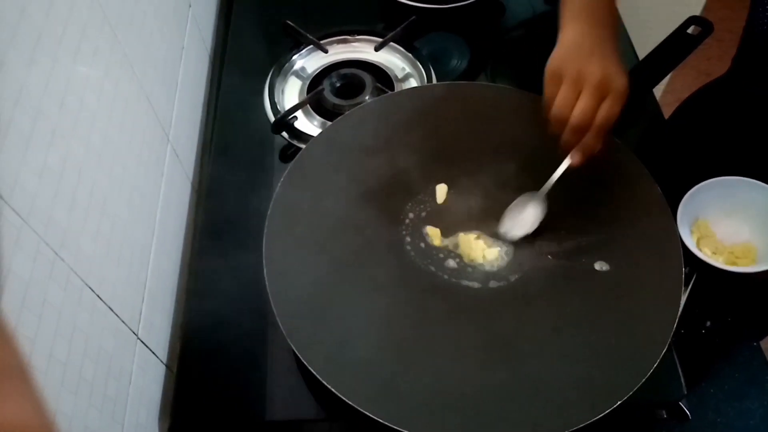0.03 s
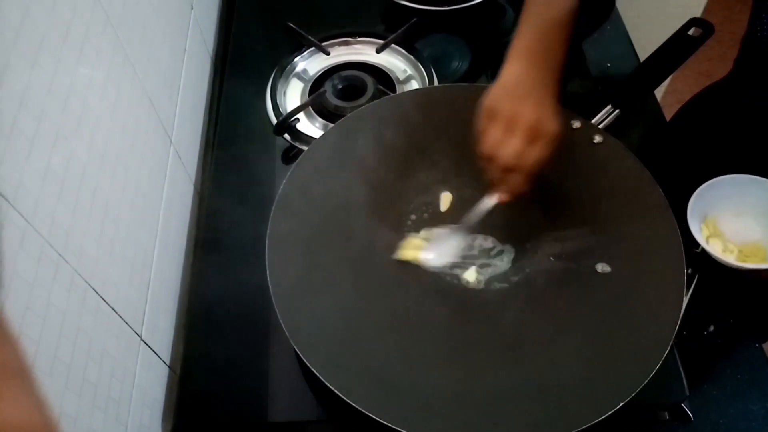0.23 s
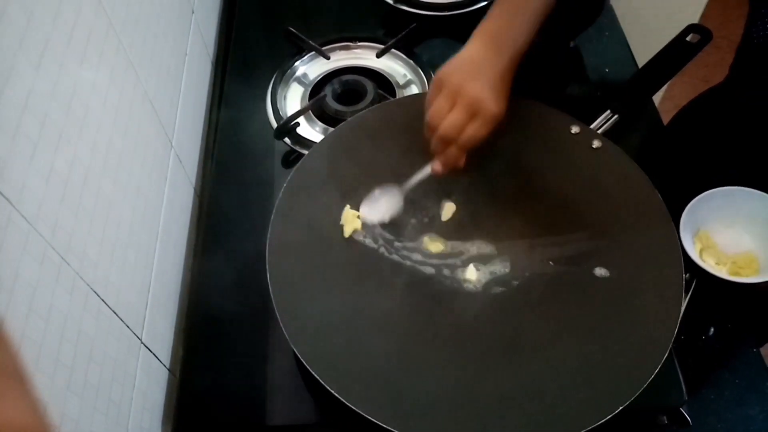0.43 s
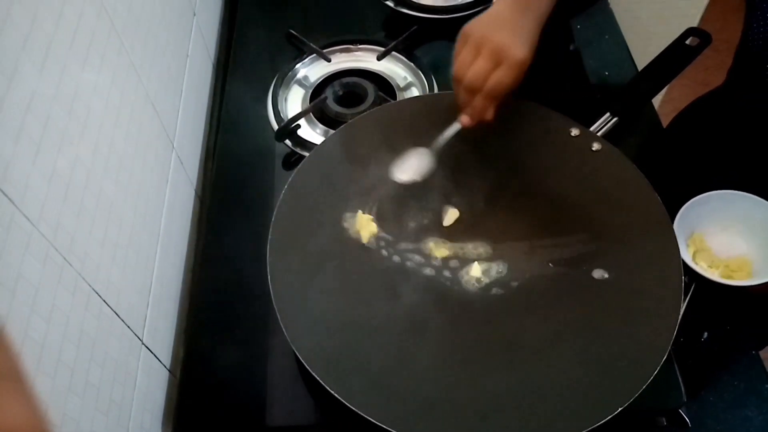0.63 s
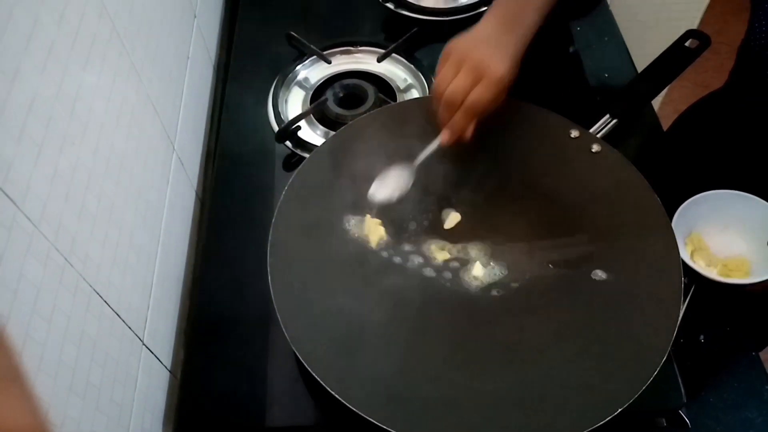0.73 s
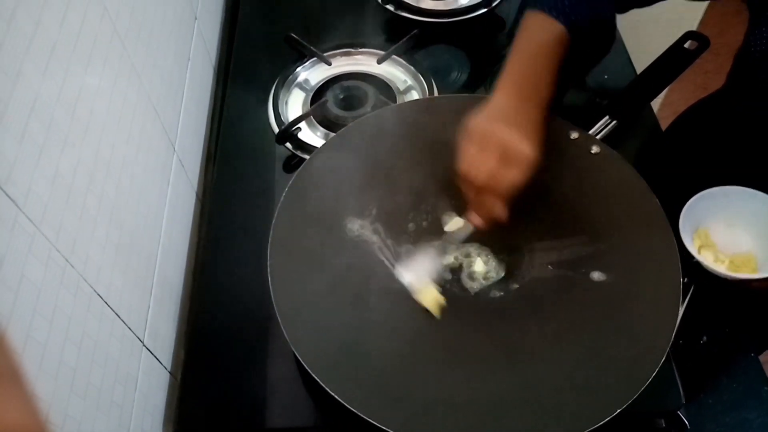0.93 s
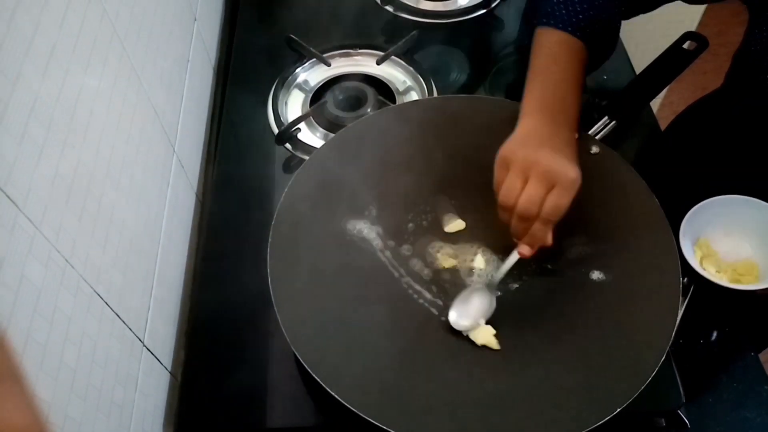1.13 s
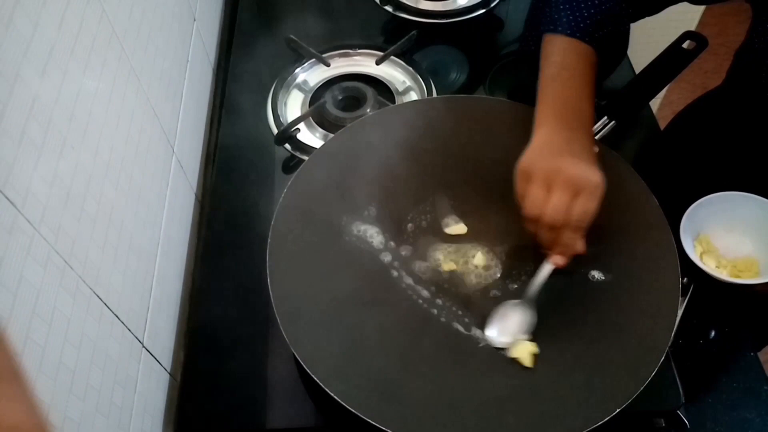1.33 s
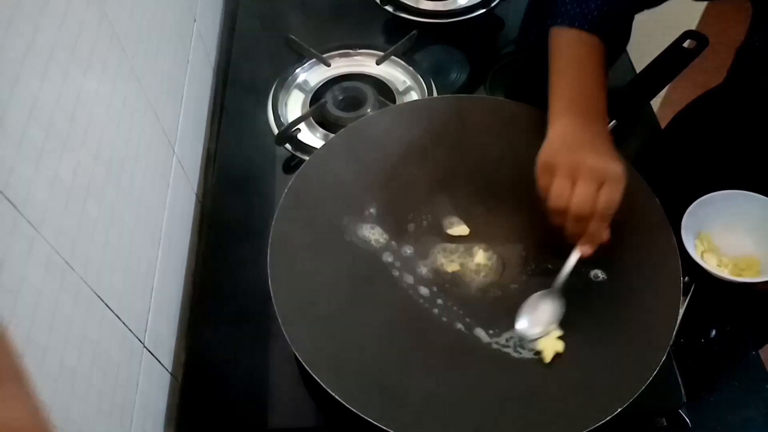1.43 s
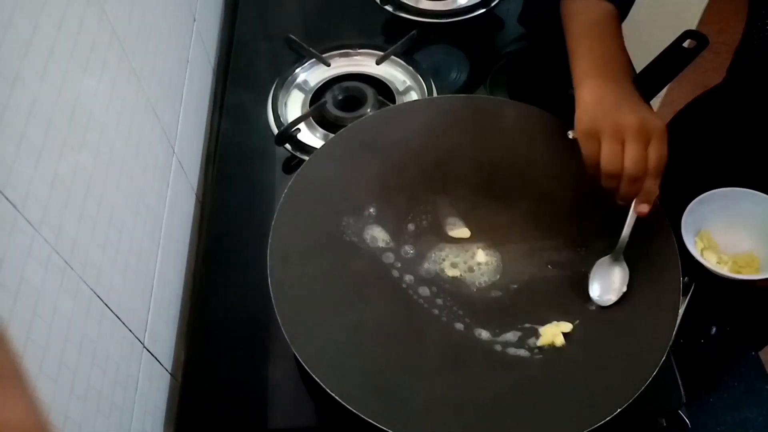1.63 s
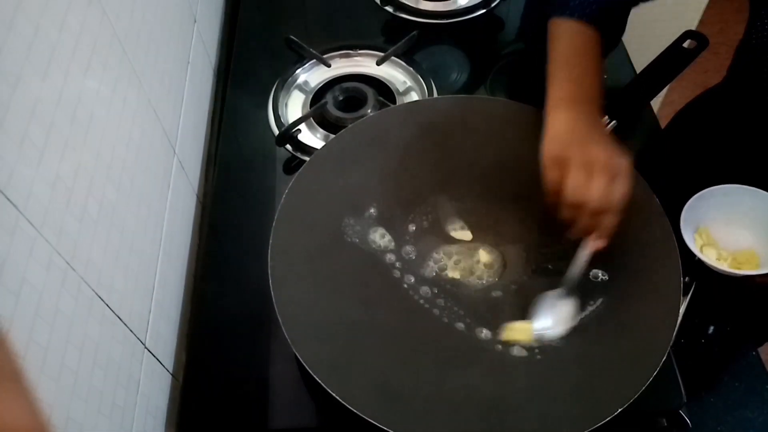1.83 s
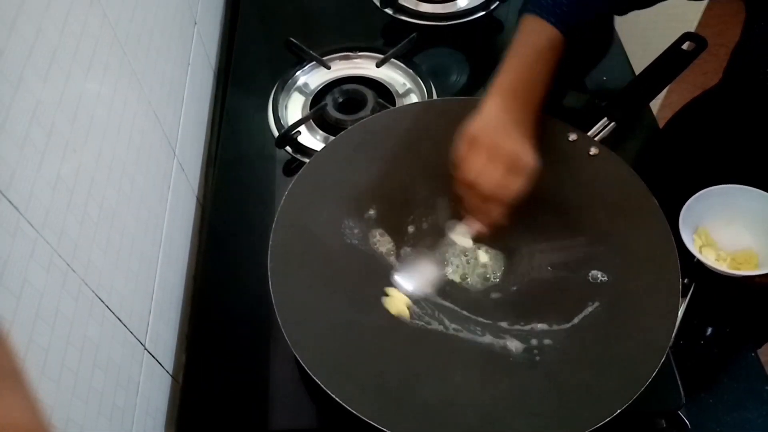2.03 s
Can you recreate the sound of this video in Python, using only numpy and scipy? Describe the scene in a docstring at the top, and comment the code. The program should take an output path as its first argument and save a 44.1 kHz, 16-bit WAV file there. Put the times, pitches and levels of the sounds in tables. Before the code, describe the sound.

Butter sizzles on a hot flat pan for about two seconds, a constant, bright, fine-grained hiss with fluttering crackles. Small spits cluster near 0.3, the sharpest pop snaps at 0.65, and another comes around 2.0. A metal spoon rasps softly at the start, taps near 1.0 and 1.15, knocks and rings the pan clearest at 1.37, then scrapes again from 1.9. Faint low burner rumble; close stereo, short kitchen reverberation.

```python
"""Butter sizzling on a griddle

Thousands of tiny steam bubbles burst as damped pings; a few larger ones spit with a crack and a ping.
A steel spoon rasps, knocks and rings the modes of the pan, over the low rumble of a gas burner.
A small tiled kitchen answers; the two microphones differ in colour, and the left one is nearer."""
import sys
import numpy as np
from scipy import signal
from scipy.fft import rfft, irfft, next_fast_len
from scipy.io import wavfile
from scipy.ndimage import uniform_filter1d

SR = 44100
rng = np.random.default_rng(int(sys.argv[2]) if len(sys.argv) > 2 else 0)


def generate_wav(sig):
    """Save sig (samples, or channels by samples) to the path in sys.argv[1] as 16-bit PCM at SR."""
    pcm = np.round(np.clip(np.atleast_2d(sig).T, -1, 1) * 32767).astype(np.int16)
    wavfile.write(sys.argv[1], SR, pcm)


N = 91375

# Sizzle strength. Each row: time in seconds, level in dB.
SIZZLE_LEVEL = [(0, -33.3), (.15, -35.3), (.33, -33.2), (.62, -33.2), (1.05, -32.8), (1.4, -33.3),
                (1.7, -35), (2.07, -33.9)]
# Colour of the bursting bubbles. Each row: frequency in Hz, gain in dB.
SIZZLE_COLOUR = [(30, -34), (250, -25), (600, -26), (1000, -20), (1500, -16), (2200, -11.5), (2800, -4),
                 (4000, -2.5), (6500, 0), (8300, -4.5), (9700, -1), (11000, -6), (13500, -14), (15000, -6)]
# Large bubbles that spit. Each row: start in seconds, ping level in dB, pitch in Hz, crack level in dB.
LARGE_SPITS = [(0.186, -17, 6370, -42), (.2810, -22, 6300, -34), (.2865, -10, 6070, -28),
               (.2935, -17, 6400, -34), (.3500, -15.5, 7060, -23), (0.502, -12.5, 6280, -21),
               (0.6452, -6.5, 7270, -4), (0.8559, -16, 7100, -18), (0.973, -19, 5600, -17.5),
               (0.979, -17, 6400, -22), (1.027, -18, 6500, -30), (1.045, -17, 6440, -23),
               (1.4381, -18.5, 6600, -33), (2.0364, -10.5, 6200, -28)]
# Colour of the spit cracks. Each row: frequency in Hz, gain in dB.
CRACK_COLOUR = [(40, -24), (200, -20), (600, -15), (1500, -20.5), (3000, -11.5), (5000, 0.5), (7500, 1),
                (10000, 8), (12000, -4), (15000, -6)]
# Spoon strokes. Each row: start in seconds, length in seconds, rasp level in dB, rasp pitch in Hz,
# pan ring level in dB.
SPOON_STROKES = [(0, 0.15, -48.5, 1494, -57), (0.236, .04, -53, 1550, -50), (0.745, 0.02, -44, 1520, -52),
                 (1.035, 0.052, -63, 300, -60), (1.155, 0.008, -41.5, 1620, -45),
                 (1.367, 0.03, -49, 1830, -41), (1.903, 0.15, -48.5, 1500, -53),
                 (2.045, .03, -44, 1450, -42)]
# Spoon landing on the pan. Each row: start in seconds, strength in dB, contact brightness in Hz.
SPOON_KNOCKS = [(0.9712, 0, 4500), (1.158, 4.5, 1600), (1.3685, 13, 3400), (1.383, 5, 4400)]
# Drag of the spoon between strokes. Each row: time in seconds, ring level in dB.
DRAG_LEVEL = [(0, -47), (.5, -75), (1.1, -60), (1.45, -50.5), (2.07, -47)]
# Modes of the pan. Each row: frequency in Hz, width in Hz, level in dB.
PAN_MODES = [(280, 110, -12), (830, 15, -6), (987, 20, -10), (1364, 44, -3.5), (1548, 30, -1),
             (1655, 28, -3.5), (1786, 32, -4), (2150, 36, -1.5), (2603, 24, -1.5), (3155, 44, 6.5),
             (3745, 40, -1), (4450, 50, 2)]
# Pan singing under the spoon. Each row: start in seconds, length in seconds, pitch in Hz, level in dB.
PAN_SONGS = [(1.368, .045, 830, -54.5), (1.44, .23, 829, -64), (1.525, .075, 2165, -50),
             (1.51, .12, 1645, -53), (1.68, .24, 727, -68), (1.9, .07, 1385, -48), (1.93, .1, 825, -66),
             (2.03, .07, 1370, -45)]
# Colour of the flame. Each row: frequency in Hz, gain in dB.
FLAME_COLOUR = [(25, -42), (50, -18), (80, 0), (135, 3), (220, -11), (400, -12.5), (800, -13),
                (2000, -24.5)]
# Low drone. Each row: time in seconds, level in dB.
DRONE_LEVEL = [(0, -70), (.2, -66), (.24, -80), (.53, -66), (.62, -79), (.86, -70), (.96, -76), (1.32, -70),
               (1.48, -80), (1.7, -63), (1.86, -63), (2.04, -58)]
# Microphone colours. Each row: frequency in Hz, gain in dB.
LEFT_COLOUR = [(200, 0), (2000, -1.5), (3000, -2), (9800, 0), (11500, -8.5), (12500, -5), (13800, -13),
               (15000, -7.5)]
RIGHT_COLOUR = [(200, 2), (1500, 5), (4000, 0), (5000, 1.5), (6000, 8), (6500, 11.5), (7000, 6), (8300, -1),
                (10000, 2), (15000, 3.5)]

TOP_HZ = 15700  # band limit, and highest bubble pitch
BUBBLES_PER_S, BUBBLE_DECAY_S = 9000, 0.00012
BUBBLE_MEAN_DB, BUBBLE_CAP_DB = 4.5, 20.5  # exponential spread of strength in dB
PATCHY_DB = 1.02  # rms
FLARES_PER_S, FLARE_DB, FLARE_DECAY_S = 45, 4.5, 0.0037  # rate per patch of foam
SIZZLE_WET_DB = 3
SPIT_PEAK_S, CRACK_DECAY_S, SPIT_WET_DB = 0.000415, 0.0005, -9.5
SMALL_SPITS_PER_S, SMALL_SPIT_MAX_DB, SMALL_SPIT_RANGE_DB = 40, -18, 8
SMALL_CRACK_DB = -6  # relative to the ping setting
SMALL_SPIT_HZ, SMALL_SPIT_OCTAVES = 6600, 1.3
SPIT_DIRECT_DB, SPIT_ECHO_DB, SPIT_ECHO_S = -3.5, -5.5, 0.000762  # paths to the right microphone
STROKE_ATTACK_S, STROKE_RELEASE_S = 0.001, 0.008
RASP_STAGE_WIDTH_HZ = 520  # of each of three cascaded resonances
SLIPS_PER_S, SLIP_SPREAD_DB = 4000, 5
KNOCK_WIDTH_RATIO, KNOCK_CLICK_DB = 1.3, -26  # push width / centre; click beside the modes
DRAG_LOW_HZ = 900
SING_WIDTH_HZ = 9
FLAME_DB, DRONE_HZ, DRONE_WIDTH_HZ = -65, 81, 13
LAG_S, LAG_SCATTER_S = .00102, .00005  # later arrival at the right microphone
ROOM_T60_S, ROOM_GAP_S = 0.21, .002


def sizzle(count=4):
    """Several patches of butter boil at once, each with its own bursts and flares."""
    bubbles = sum(foam(size=count) for _ in range(count))
    return unit(coloured(patchy(bubbles), SIZZLE_COLOUR)) * amp(curve(SIZZLE_LEVEL))


def foam(size):
    """One of size patches of foam: each bubble bursts as a tiny ping of its own pitch and strength."""
    u = rng.random((int(BUBBLES_PER_S * N / SR / size), 4))
    t = np.arange(48) / SR
    strength_db = np.minimum(-BUBBLE_MEAN_DB * np.log(1 - u[:, 0]), BUBBLE_CAP_DB)
    waves = np.cos(2 * np.pi * (TOP_HZ * u[:, 1:2] * t + u[:, 2:3]))
    pings = amp(strength_db)[:, None] * np.exp(-t / BUBBLE_DECAY_S) * waves
    start = u[:, 3] * N
    lag = np.abs(LAG_S + LAG_SCATTER_S * rng.standard_normal(len(u))) * SR

    def placed(first):
        samples = first.astype(int)[:, None] + np.arange(len(t))
        return np.bincount(samples.ravel(), pings.ravel(), N)[:N]
    pair = np.array([placed(start), placed(start + lag)])
    return kitchen(pair * amp(flares()), SIZZLE_WET_DB)


def flares():
    """Clusters of bubbles going off: sudden rises in level, in dB, each with a quick fall."""
    kicks = (rng.random(N) < FLARES_PER_S / SR) * FLARE_DB
    return signal.lfilter([1], [1, -np.exp(-1 / (FLARE_DECAY_S * SR))], kicks)


def patchy(x):
    """Random gain over patches of time and frequency: bands of the sizzle flare on their own."""
    z = signal.stft(x, nperseg=256)[2]
    field = uniform_filter1d(rng.standard_normal(z.shape[1:]), size=10, axis=0)  # over frequency
    field = uniform_filter1d(field, size=9, axis=1)  # over time
    return signal.istft(z * amp(PATCHY_DB * unit(field)), nperseg=256)[1][:, :N]


def spits():
    """A large bubble snaps open with a crack and a very short ping."""
    pings, cracks = np.zeros(N + SR), np.zeros(N + SR)
    t = np.arange(SR // 100) / SR
    ping_envelope = 0.5 * t / SPIT_PEAK_S * np.exp(1 - t / SPIT_PEAK_S)
    crack_envelope = np.exp(-t / CRACK_DECAY_S)
    for start, ping_db, hz, crack_db in list(LARGE_SPITS) + small_spits():
        first = round(start * SR)
        pings[first:][:len(t)] += amp(ping_db) * np.sin(2 * np.pi * hz * t) * ping_envelope
        cracks[first:][:len(t)] += amp(crack_db) * rng.choice([-1, 1], len(t)) * crack_envelope
    return kitchen(spit_paths(pings[:N] + coloured(cracks[:N], CRACK_COLOUR)), SPIT_WET_DB)


def small_spits():
    """Middle-sized bubbles at random moments, as rows like those of the large ones."""
    u = rng.random((int(SMALL_SPITS_PER_S * N / SR), 3))
    db = SMALL_SPIT_MAX_DB - SMALL_SPIT_RANGE_DB * u[:, 1]
    hz = SMALL_SPIT_HZ * 2 ** (SMALL_SPIT_OCTAVES * (u[:, 2] - .5))
    return list(zip(u[:, 0] * N / SR, db, hz, db + SMALL_CRACK_DB))


def spit_paths(x):
    """A spit reaches the right microphone twice: directly and off a nearby surface."""
    left, right = at_mics(x)

    def paths(f):
        return amp(SPIT_DIRECT_DB) + amp(SPIT_ECHO_DB) * delay(f, SPIT_ECHO_S)
    return np.array([left, filtered(right, paths)])


def spoon():
    """Each stroke rasps in a broad resonance: bright on bare steel, dull where butter cushions the spoon."""
    def rasp(hz):
        return unit(filtered(slips(), lambda f: resonance(f, hz, RASP_STAGE_WIDTH_HZ) ** 3))
    out = sum(amp(db) * stroke(start, length) * rasp(hz) for start, length, db, hz, _ in SPOON_STROKES)
    return kitchen(at_mics(out), wet_db=-7)


def slips():
    """Steel catches and slips on the pan in tiny irregular jerks."""
    return (rng.random(N) < SLIPS_PER_S / SR) * amp(SLIP_SPREAD_DB * rng.standard_normal(N))


def stroke(start, length):
    """Pressure of one stroke: attack, hold, release."""
    t = np.arange(N) / SR - start
    return np.clip(t / STROKE_ATTACK_S, 0, 1) * np.exp(-np.maximum(t - length, 0) / STROKE_RELEASE_S)


def knocks():
    """The spoon lands on the pan: one short push rings the modes, with a bare click."""
    def push(f):
        return sum(amp(db) * resonance(f, hz, hz * KNOCK_WIDTH_RATIO) * delay(f, start)
                   for start, db, hz in SPOON_KNOCKS)
    ring = filtered(signal.unit_impulse(N), lambda f: push(f) * (pan_body(f) + amp(KNOCK_CLICK_DB)))
    return kitchen(at_mics(ring), wet_db=-10)


def pan():
    """The dragging spoon keeps the upper modes of the pan ringing; each stroke drives all of them harder."""
    drag = slips()
    light = filtered(drag, lambda f: 1 / (1 + (DRAG_LOW_HZ / (f + 1)) ** 8))  # high-pass
    pressure = sum(amp(db) * stroke(start, length) for start, length, _, _, db in SPOON_STROKES)
    force = light * amp(curve(DRAG_LEVEL)) + drag * pressure
    ring = filtered(force, pan_body) / np.std(filtered(drag, pan_body))
    return kitchen(at_mics(ring), wet_db=-10.5)


def pan_body(f):
    """Response of all the modes of the pan, with alternating signs."""
    return sum((-1) ** k * amp(db) * resonance(f, hz, width)
               for k, (hz, width, db) in enumerate(PAN_MODES))


def singing():
    """As the spoon travels it catches one resonance of the pan after another; each swells and fades."""
    t = np.arange(N) / SR

    def swell(start, length):
        return np.sqrt(np.abs(np.sin(np.pi * np.clip((t - start) / length, 0, 1))))
    return at_mics(sum(amp(db) * swell(start, length) * tone(hz, SING_WIDTH_HZ)
                       for start, length, hz, db in PAN_SONGS))


def burner():
    """The soft rumble of the flame, and a low drone that wavers and swells near the end."""
    noise = coloured(rng.standard_normal(N), FLAME_COLOUR)
    flame = unit(kitchen(at_mics(noise), wet_db=-6))
    drone = tone(DRONE_HZ, DRONE_WIDTH_HZ) * amp(curve(DRONE_LEVEL))
    return amp(FLAME_DB) * flame + at_mics(drone)


def kitchen(pair, wet_db):
    """Add the short ring of the room, decaying noise that differs at each microphone."""
    t = np.arange(SR // 2) / SR
    tail = rng.standard_normal((2, len(t))) * amp(-60 * t / ROOM_T60_S) * (t > ROOM_GAP_S)
    tail /= np.linalg.norm(tail[0])
    return pair + amp(wet_db) * signal.fftconvolve(pair, tail, axes=1)[:, :N]


def at_mics(x):
    """A sound from the pan reaches the left microphone first."""
    return np.array([x, filtered(x, lambda f: delay(f, LAG_S))])


def tone(hz, width):
    """A sine of rms 1 whose phase drifts, so that its line has the given width in Hz."""
    drift = rng.standard_normal(N) * np.sqrt(2 * np.pi * width / SR)
    line = np.sin(np.cumsum(2 * np.pi * hz / SR + drift))
    return unit(filtered(line, lambda f: resonance(f, hz, hz / 2)))


def resonance(f, hz, width):
    """Response of one mode."""
    return 1j * f * width / (hz * hz - f * f + 1j * f * width)


def delay(f, seconds):
    """Response of a pure delay."""
    return np.exp(-2j * np.pi * f * seconds)


def coloured(x, points):
    """x through a causal minimum-phase filter with the given (Hz, dB) points."""
    def response(f):
        hz, db = np.transpose(points)
        gain = amp(np.interp(np.log(f + 1), np.log(hz + 1), db))
        cepstrum = irfft(np.log(gain))
        half = len(cepstrum) // 2
        return np.exp(rfft(np.r_[cepstrum[0], 2 * cepstrum[1:half]], len(cepstrum)))
    return filtered(x, response)


def filtered(x, response):
    """x times a complex response of frequency."""
    m = 2 * next_fast_len(N)
    return irfft(rfft(x, m) * response(np.fft.rfftfreq(m, 1 / SR)), m)[..., :N]


def curve(rows):
    """(s, value) points as one value per sample."""
    return np.interp(np.arange(N) / SR, *np.transpose(rows))


def unit(x):
    """Scale to rms 1."""
    return x / np.sqrt(np.mean(x ** 2) + 1e-20)


def amp(db):
    """Decibels to gain."""
    return 10 ** (np.asarray(db) / 20)


def scene():
    """Butter, spoon, pan and flame together."""
    return sizzle() + spits() + spoon() + pan() + knocks() + singing() + burner()


def record(dry):
    """The left microphone is dull at the top, the right one rings in the treble; both end at the band limit."""
    pair = np.array([coloured(dry[0], LEFT_COLOUR), coloured(dry[1], RIGHT_COLOUR)])
    return filtered(pair, lambda f: f < TOP_HZ)


dry = scene()
out = record(dry)
generate_wav(out)
```